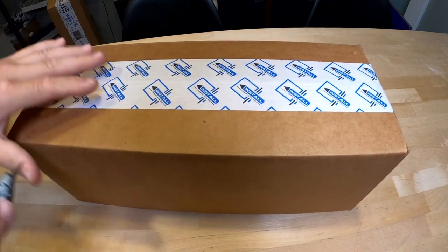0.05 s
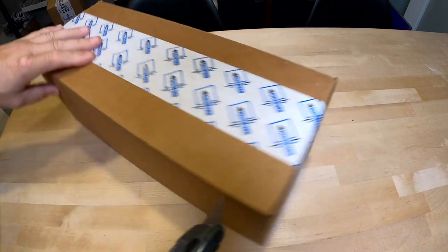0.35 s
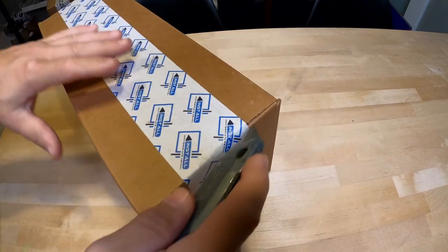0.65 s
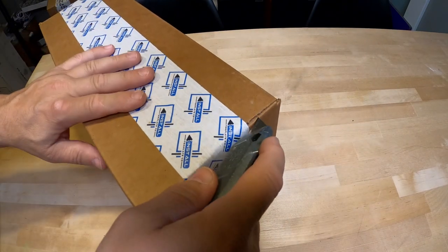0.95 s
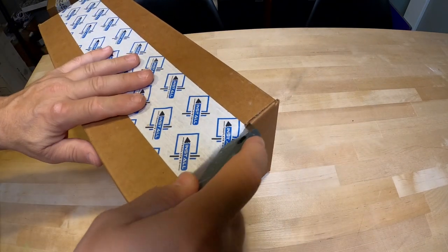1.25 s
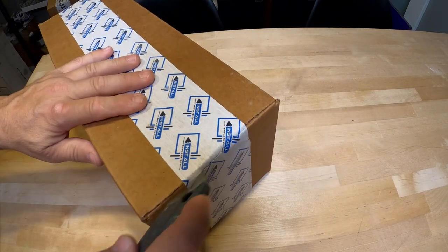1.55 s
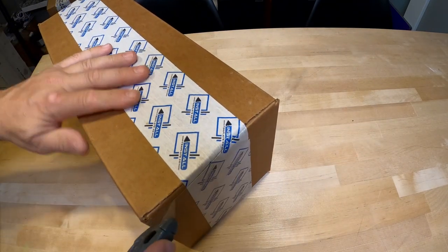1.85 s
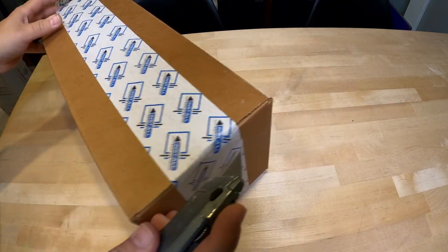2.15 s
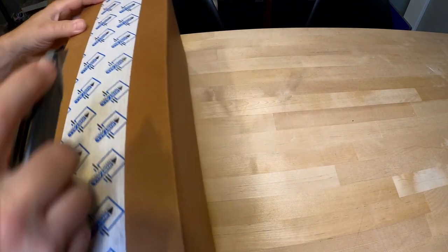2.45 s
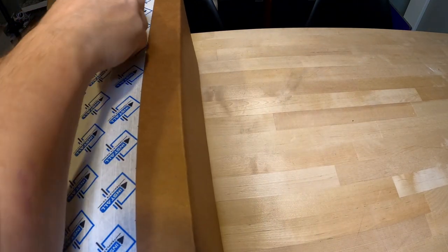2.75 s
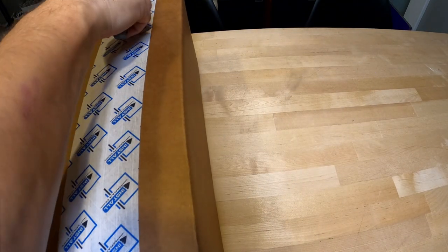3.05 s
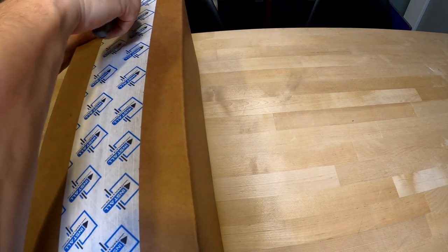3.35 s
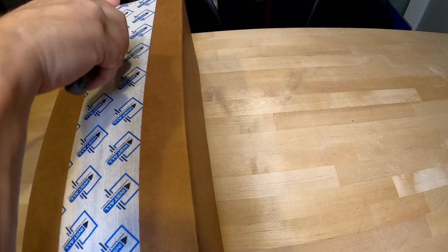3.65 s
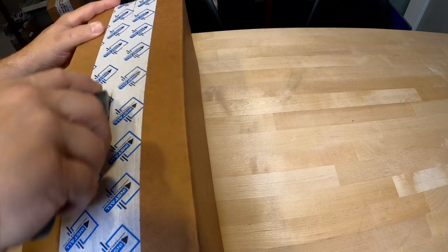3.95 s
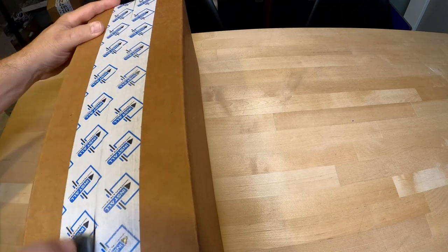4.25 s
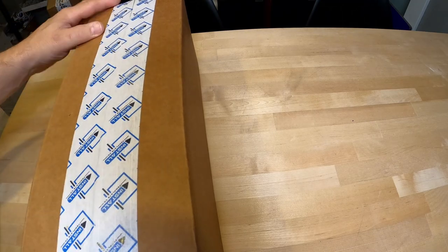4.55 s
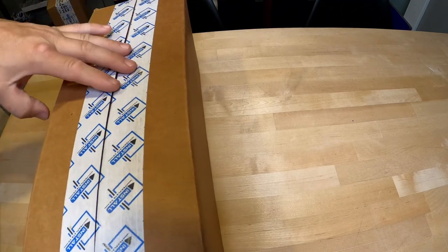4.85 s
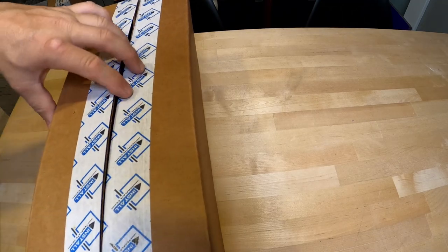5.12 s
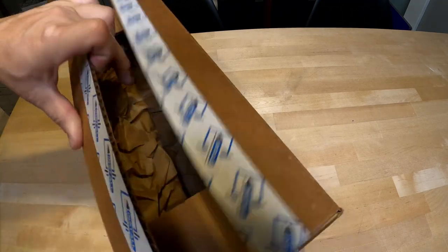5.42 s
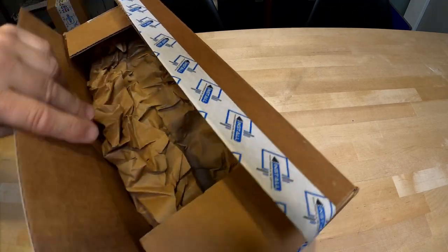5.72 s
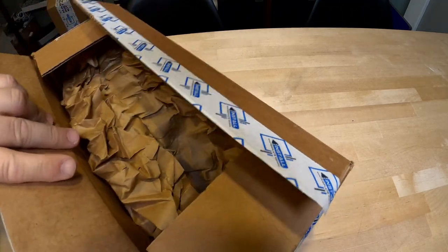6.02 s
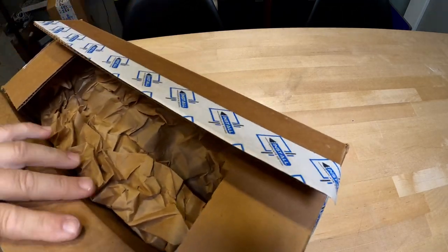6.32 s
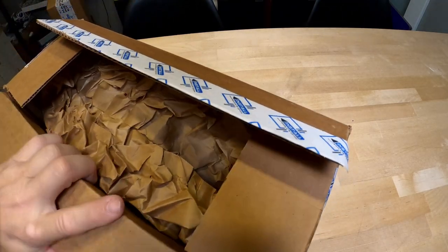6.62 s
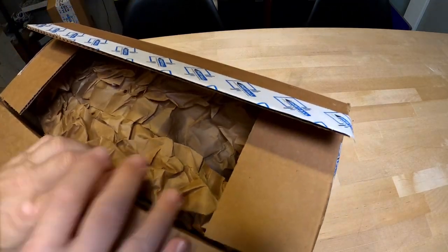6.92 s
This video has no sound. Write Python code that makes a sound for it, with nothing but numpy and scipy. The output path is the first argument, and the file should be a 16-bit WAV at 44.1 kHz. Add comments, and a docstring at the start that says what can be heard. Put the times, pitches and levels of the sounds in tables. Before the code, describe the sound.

Close scraping and knife cuts along a taped cardboard box, followed by flaps popping open and a light crinkle of paper.

```python
"""Opening a cardboard box

A taped box is slid round on a wooden bench, slit with a utility knife and pulled open, close by.
Sliding, cutting and rubbing are streams of tiny slips that hiss at the contact and excite the
resonances of the hollow box. The blade ticks, the tape snaps, the flaps thump, and packing paper
rustles in a small dry workshop."""
import sys
import numpy as np
from scipy import signal
from scipy.fft import rfft, irfft
from scipy.io import wavfile
from scipy.ndimage import uniform_filter1d, map_coordinates

SR = 44100
rng = np.random.default_rng(int(sys.argv[2]) if len(sys.argv) > 2 else 0)


def pcm_store(signal):
    """Save signal as 16-bit PCM."""
    levels = np.round(np.clip(np.atleast_2d(signal), -1, 1) * 32767)
    wavfile.write(sys.argv[1], SR, levels.astype(np.int16).T)


N = 316638
TAPS = 8192
TIME, HZ = np.arange(N) / SR, np.fft.rfftfreq(TAPS, 1 / SR)

# resonances of the box, its enclosed air first: pitch_hz, width_hz, lift_db
BOX_MODES = [(235.6, 17.4, 12.5), (303.6, 35, 5.5), (445, 14, 6), (494, 72, 5.5), (560.4, 32, 6),
             (906, 32, 4)]


def from_db(db):
    """Decibels to amplitude gain."""
    return 10 ** (np.asarray(db) / 20)


def unit(x):
    """Normalises to rms 1."""
    return x / np.sqrt(np.mean(x ** 2) + 1e-20)


def struck(x):
    """Normalises a transient to rms 1 over its loudest 6 ms."""
    return x / np.sqrt(uniform_filter1d(x ** 2, 256).max() + 1e-20)


def read(points, hz=HZ):
    """Interpolates a curve on a log-frequency axis."""
    f, value = np.transpose(points)
    return np.interp(np.log(hz + 1), np.log(f), value)


def add(mix, s, sound):
    """Superposes a sound on the mix at time s."""
    part = mix[max(round(s * SR), 0):][:len(sound)]
    part += sound[:len(part)]


def wander(rate):
    """Random fluctuation of rms 1 that changes rate times a second."""
    return unit(np.interp(TIME * rate, np.arange(N), rng.standard_normal(N)))


def colour(x, db):
    """Minimum-phase filter with this gain curve: peaks ring after a click."""
    cepstrum = irfft(np.maximum(db, db.max() - 100) * np.log(10) / 20)
    cepstrum[1:TAPS // 2] *= 2
    cepstrum[TAPS // 2 + 1:] = 0
    return signal.fftconvolve(x, irfft(np.exp(rfft(cepstrum))))[:len(x)]


def low_pass(hz, order=2):
    """Butterworth low-pass response in dB."""
    return -10 * np.log10(1 + (HZ / hz) ** (2 * order))


def high_pass(hz, order=2):
    """Butterworth high-pass response in dB."""
    return -10 * np.log10(1 + (hz / (HZ + 1)) ** (2 * order))


def peak(hz, q):
    """Response in dB of two equal resonators in series."""
    return -20 * np.log10(1 + (q * (HZ / hz - hz / (HZ + 1))) ** 2)


def hollow():
    """Modal response of the box in dB."""
    return sum(db / (1 + (2 * (HZ - hz) / width) ** 2) for hz, width, db in BOX_MODES)


def spot(depth_db=2):
    """Modal coupling in dB: one contact point drives the many wall modes unevenly."""
    ripple = uniform_filter1d(uniform_filter1d(rng.standard_normal(len(HZ)), 21), 21)
    return depth_db * unit(ripple) * from_db(high_pass(450))


def travelling(x, spots_per_s, depth_db, fine_hz=170, broad_hz=1100):
    """Modal coupling shifts as the contact moves, so fine and broad spectral peaks keep changing."""
    hz, t, spectra = signal.stft(x, SR, nperseg=1024)
    for db, width in ((depth_db, fine_hz), (depth_db / 2, broad_hz)):
        place = np.meshgrid(hz / width, t * spots_per_s, indexing="ij")
        field = unit(map_coordinates(rng.standard_normal(spectra.shape), place, order=1, mode="wrap"))
        spectra *= from_db(db * field * (hz / (hz + 400))[:, None])
    return unit(signal.istft(spectra, SR)[1][:N])


def stroke(rows, column=1):
    """Strokes add in energy: each speeds up and, past its length, drops 20 dB per fall time."""
    energy = np.zeros(N)
    for row in rows:
        length, rise, fall = row[-3:]
        t = np.arange(0, length + 2 * fall, 1 / SR)
        speed = np.sin(np.pi / 2 * np.minimum(t / rise, 1))
        speed *= from_db(-20 * np.maximum(t - length, 0) / fall)
        add(energy, row[0], (from_db(row[column]) * speed) ** 2)
    return np.sqrt(energy)


def friction(rows, tone, slips_per_s, spread_db, clump_db, clump_rate, hiss_db, body_db,
             spots_per_s, spot_db, push=1, split_hz=1900):
    """Friction noise: fibres slip in clumps; each slip hisses at the contact and knocks the box."""
    sizes = from_db(spread_db * np.minimum(rng.exponential(1, N), 4)) * rng.choice([-1, 1], N)
    slips = sizes * (rng.random(N) < slips_per_s / SR) * from_db(clump_db * wander(clump_rate))
    slips = travelling(slips, spots_per_s, spot_db)
    out = np.zeros(N)
    for column, band, db in ((1, high_pass(split_hz), hiss_db), (2, low_pass(split_hz), body_db)):
        shape = read(tone) + hollow() + band
        sound = colour(slips * push * stroke(rows, column), shape) / colour(slips, shape).std()
        out += (-1) ** column * from_db(db) * sound  # opposite signs join the bands without a notch
    return out


def stick_slip(rows, modes, q):
    """Stick-slip motion locks briefly onto a few modes of the card."""
    gain = sum(from_db(db + peak(hz, q)) for hz, db in modes)
    return stroke(rows) * unit(colour(rng.standard_normal(N), 20 * np.log10(gain)))


def ticks(rows, treble_db, q, burst_t60, hz=None, rise_s=0.00025):
    """Acoustic emission: a burst of tiny cracks gives a bright snap and rings a patch of card."""
    # spectrum of the snap: frequency_hz, level_db
    snap_tone = [(500, -23.5), (2000, 23.5), (6500, 22), (11000, 14), (16000, 10)]
    out, t = np.zeros(N), TIME[:TAPS]
    envelope = from_db(-60 * t / burst_t60) * (1 - np.exp(-t / rise_s))
    for row in rows:
        s, db = row[:2]
        burst = colour(rng.standard_normal(TAPS) * envelope, spot())
        ring = from_db(-3) * struck(colour(burst, peak(hz or row[2], q)))
        snap = from_db(treble_db - 4) * struck(colour(burst, read(snap_tone)))
        add(out, s, from_db(db) * (ring + snap))
    return out


def ringing(rows, modes, detune=0.04):
    """Free vibration: each sudden release rings a panel's damped modes, slightly detuned."""
    out, t = np.zeros(N), TIME[:TAPS]
    for s, db in rows:
        shifts = 1 + detune * rng.standard_normal(len(modes))
        ring = sum(from_db(level - 60 * t / t60) * np.sin(2 * np.pi * hz * shift * t)
                   for (hz, level, t60), shift in zip(modes, shifts))
        add(out, s, from_db(db) * struck(ring))
    return out


def crackle(rows, count, db, t60, low_hz, high_hz, spread_db=10, q=3.1):
    """Crackling noise: fibres and small folds give way at random during the strokes."""
    out, t, force = np.zeros(N), TIME[:TAPS // 2], stroke(rows)
    during = np.concatenate([np.flatnonzero((TIME > s) & (TIME < s + length))
                             for s, *_, length, rise, fall in rows])
    for when, size, pitch in rng.random((count, 3)):
        at = during[int(when * len(during))]
        hz = low_hz * (high_hz / low_hz) ** pitch
        burst = rng.standard_normal(len(t)) * from_db(-60 * t / t60)
        grain = struck(signal.lfilter(*signal.iirpeak(hz, q, fs=SR), burst))
        add(out, at / SR, force[at] * from_db(db - spread_db * size) * grain)
    return out


def thumps(rows, knock_db, bright_hz, air_db, swing_cycles,
           rise_cycles=0.41, rattle_t60=0.078, air_t60=0.33):
    """Impact excitation: a blow swings a wall, rattles the card and rings the enclosed air."""
    out, t = np.zeros(N), TIME[:2 * TAPS]
    air_ring = np.sin(2 * np.pi * BOX_MODES[0][0] * t) * from_db(air_db - 60 * t / air_t60)
    card = hollow() + low_pass(bright_hz) + high_pass(193)
    for s, db, hz in rows:
        cycles = hz * t
        envelope = (1 - np.exp(-cycles / rise_cycles)) * from_db(-60 * cycles / swing_cycles)
        swing = struck(np.sin(2 * np.pi * cycles) * envelope)
        rattle = rng.standard_normal(len(t)) * from_db(-60 * t / rattle_t60)
        knock = struck(colour(rattle, card)) + air_ring
        add(out, s, from_db(db) * (swing + from_db(knock_db) * knock))
    return out


def wall_blows():
    """Impacts set the walls in damped vibration; harder ones give a brighter knock."""
    # soft bumps of the hands: start_s, level_db, pitch_hz
    bumps = [(.277, -34, 95), (.286, -36, 200), (.883, -34, 78.5), (2.482, -34, 214), (4.589, -35, 124),
             (4.781, -25.5, 95.5), (6.26, -23.5, 50.6), (6.448, -33, 54.5), (6.655, -27, 140),
             (7.084, -24.5, 126)]
    # hard knocks of bench, knife and flap: start_s, level_db, pitch_hz
    knocks = [(2.402, -30.5, 470), (2.91, -38, 96), (3.889, -29, 115), (5.337, -36, 483)]
    # flaps springing free and rebounding: start_s, level_db, pitch_hz
    flaps = [(5.492, -21, 138), (5.504, -22, 224), (5.562, -26.5, 183), (5.613, -32, 82.4)]
    # sways with hardly a knock: start_s, level_db, pitch_hz
    sways = [(5.494, -31, 62), (5.494, -28, 62), (5.772, -26, 81), (6.298, -27.5, 85.6), (7.108, -22, 51)]
    return (thumps(bumps, knock_db=-13, bright_hz=330, air_db=-1, swing_cycles=3.7)
            + thumps(knocks, knock_db=-7.5, bright_hz=586, air_db=-44, swing_cycles=5.9)
            + thumps(flaps, knock_db=-4, bright_hz=296, air_db=-2.5, swing_cycles=5.1)
            + thumps(sways, knock_db=-26, bright_hz=248, air_db=-20, swing_cycles=5.6))


def sliding():
    """Sliding friction of the box on the bench and of hands on the box."""
    # strokes: start_s, hiss_db, body_db, length_s, rise_s, fall_s
    slides = [(.28, -60.5, -49, 0.33, 0.011, 0.11), (.305, -45.5, -54.5, 0.24, 0.14, 0.11),
              (.87, -61.5, -50, 0.043, 0.04, 0.016), (2.195, -65.5, -56.5, 0.18, 0.005, 0.055),
              (2.4, -54, -52.5, 0.28, 0.0024, 0.16), (2.91, -68, -49, 0.035, 0.027, 0.22),
              (3.13, -68, -52, 0.014, 0.0043, 0.18), (4.775, -50.5, -48.5, 0.065, 0.011, 0.12),
              (4.93, -73, -54.5, .3, .05, 0.025), (5.64, -60.5, -53.5, 0.25, 0.054, 0.26)]
    # contact spectrum: frequency_hz, level_db
    tone = [(60, 6), (230, 9), (500, 6.5), (1100, 3.5), (2000, -4), (4500, -5), (8500, -5.5),
            (10500, -11.5), (16000, -18.5)]
    return friction(slides, tone, slips_per_s=18000, spread_db=1, clump_db=1.6, clump_rate=360,
                    hiss_db=2, body_db=-3, spots_per_s=16, spot_db=1.64)


def edge_squeal():
    """Stick-slip on the bench drives one resonance of the bottom edge."""
    # squeals: start_s, level_db, length_s, rise_s, fall_s
    squeals = [(.5, -44, .055, .04, .05), (.57, -53, .07, .02, .04)]
    # edge resonance: pitch_hz, level_db
    modes = [(990, 0)]
    return stick_slip(squeals, modes, q=8.2)


def tape_snaps():
    """Impact and fracture: the blade ticks on the tape and its last threads snap."""
    # ticks and snaps: start_s, level_db, pitch_hz
    snaps = [(1.082, -48.5, 2670), (1.163, -61, 3870), (1.938, -58, 5281), (3.133, -49.5, 2040),
             (3.321, -61, 3680), (4.784, -46.5, 2800), (4.96, -52.5, 4860), (5.281, -53.5, 2960),
             (5.424, -43.5, 6500), (5.476, -32.5, 2530)]
    return ticks(snaps, treble_db=8, q=1, burst_t60=0.055)


def card_cracks():
    """Fracture releases strain in the card along the seam and the folds."""
    # cracks: start_s, level_db
    cracks = [(1.082, -56.5), (3.403, -43), (3.628, -40), (3.891, -29.5), (4.717, -46.5), (5.045, -44.5),
              (5.153, -43), (5.214, -42.5), (5.337, -41), (5.4, -35.5), (5.49, -25.5), (5.562, -31),
              (5.613, -34), (5.994, -52.5)]
    return ticks(cracks, treble_db=-4.5, q=2.6, burst_t60=0.084, hz=975)


def tape_punctures():
    """The taut tape rings as a membrane when the blade pricks it and punches through."""
    # pricks: start_s, level_db
    punctures = [(1.3025, -42), (1.3112, -39), (1.3142, -33.5)]
    # tape modes: pitch_hz, level_db, t60_s
    modes = [(330, -9, .02), (680, -5, .016), (1427, 0, .019), (2500, -6, .012)]
    return ringing(punctures, modes)


def end_cutting():
    """Friction of the knife at the ends of the box."""
    # cuts: start_s, hiss_db, body_db, length_s, rise_s, fall_s
    cuts = [(1.32, -60.5, -54, 0.36, 0.021, .1), (1.56, -47, -44, 0.28, 0.56, 0.078),
            (1.937, -52, -58.5, 0.018, 0.0033, 0.041), (1.99, -49, -59.5, 0.063, 0.23, 0.046),
            (2.12, -60, -87, 0.036, 0.015, 0.028), (3.285, -72, -58.5, .11, 0.049, .03),
            (4.22, -47.5, -46.5, 0.38, 0.66, 0.018)]
    # contact spectrum: frequency_hz, level_db
    tone = [(60, -22.5), (185, 9.5), (270, -4.5), (550, -3.5), (1400, -5.5), (3500, -12.5), (6000, -6),
            (9500, -10), (16000, -23.5)]
    return friction(cuts, tone, slips_per_s=4500, spread_db=1, clump_db=1.76, clump_rate=130,
                    hiss_db=2, body_db=3.5, spots_per_s=10, spot_db=2.5)


def shuddering(hz=41.9, jitter=0.07, lumpy_db=5):
    """Relaxation oscillation: the dragged box grips and jumps in a nearly even train of pushes."""
    # drag on the bench: start_s, level_db, length_s, rise_s, fall_s
    drag = [(2.18, -39.5, 0.26, 0.3, 0.41)]
    cycles = np.cumsum(hz * (1 + jitter * wander(28))) / SR
    jumps = np.diff(np.floor(cycles), prepend=0) * from_db(lumpy_db * wander(24.93))
    return stroke(drag) * unit(colour(jumps, low_pass(55) + high_pass(23)))


def flexing(lumpy_db=6):
    """Plate bending: the walls rumble as they flex and shift on the bench."""
    # hands leaning on the walls: start_s, level_db, length_s, rise_s, fall_s
    presses = [(2.195, -42, 0.12, 0.016, 0.11), (3.44, -34, 0.51, 0.28, 0.19), (3.95, -47, 0.68, .05, 0.11),
               (4.79, -31, 0.061, 0.028, 0.063), (5.485, -25.5, 0.16, 0.019, 0.11),
               (5.7, -40, 1.19, 0.075, 0.05), (6.61, -38, 0.12, 0.021, 0.24)]
    lumps = rng.standard_normal(N) * from_db(lumpy_db * wander(30))
    rumble = unit(colour(lumps, low_pass(140, order=4) + high_pass(38)))
    return from_db(-3) * rumble * stroke(presses)


def seam_cutting(build_s=0.0055, ragged_db=3):
    """Friction and fracture in the top seam: the blade's force builds at each snag, then relaxes."""
    # labouring, tearing through, gliding: start_s, hiss_db, body_db, length_s, rise_s, fall_s
    cuts = [(3.38, -47, -37.5, 0.56, 0.33, 0.043), (3.884, -45, -25.5, 0.023, 0.0044, 0.026),
            (3.925, -47.5, -42.5, 0.58, 0.1, 0.14)]
    # contact spectrum: frequency_hz, level_db
    tone = [(60, -26), (200, 4), (310, 15), (420, 4.5), (1100, -2), (1600, -16), (2400, -23.5), (3300, -17),
            (4300, -23), (9000, -25.5), (16000, -40.5)]
    # catches of the blade: start_s, rise_db
    snags = [(3.523, 3), (3.594, 5), (3.63, 6), (3.709, 6), (3.771, 4), (3.822, 5), (4.588, 13), (4.606, 6)]
    force_db = ragged_db * wander(70) * (TIME < cuts[-1][0])  # wavers until the glide
    for s, db in snags:
        age = np.maximum(TIME - s, 0) / build_s
        force_db += db * age * np.exp(1 - age)
    rasp = friction(cuts, tone, slips_per_s=4000, spread_db=-1, clump_db=-0.4, clump_rate=300,
                    hiss_db=2, body_db=-8, spots_per_s=16, spot_db=3.5, push=from_db(force_db))
    return rasp + crackle(cuts, count=70, db=2, t60=0.024, low_hz=604, high_hz=8200)


def rustling():
    """Friction and buckling: flap edges scrape apart, then fingers rub flap and packing paper."""
    # strokes: start_s, hiss_db, body_db, length_s, rise_s, fall_s
    rustles = [(5.275, -37.5, -46.5, 0.064, 0.098, 0.018), (5.335, -50, -46, 0.15, .006, 0.05),
               (5.394, -38.5, -30.5, 0.013, 0.0085, 0.026), (6.12, -58.5, -51.5, 1.0, 0.073, 0.44),
               (6.44, -59, -47.5, 0.03, 0.016, 0.026), (6.615, -41, -40, 0.042, 0.067, 0.053),
               (6.745, -53.5, -41.5, 0.07, 0.0068, 0.083), (6.968, -45, -40, 0.015, 0.0064, 0.049),
               (7.02, -47.5, -42, 0.088, 0.017, 0.07)]
    # contact spectrum: frequency_hz, level_db
    tone = [(60, 3.5), (150, -2), (350, -9.5), (3000, -12), (8500, -8), (11000, -16.5), (16000, -19.5)]
    scrape = friction(rustles, tone, slips_per_s=5000, spread_db=-2, clump_db=0.5, clump_rate=120,
                      hiss_db=-3.5, body_db=-1, spots_per_s=35, spot_db=2)
    return scrape + crackle(rustles, count=60, db=4, t60=0.017, low_hz=1500, high_hz=9500)


def flap_clacks():
    """The stiff flap rings as a plate when it springs free and rebounds."""
    # clacks: start_s, level_db
    clacks = [(5.4915, -27.5), (5.503, -30), (5.563, -34), (5.614, -31)]
    # flap modes: pitch_hz, level_db, t60_s
    modes = [(450, -2, .06), (860, 0, .04), (1010, -8, .04), (1610, -6, .03)]
    return ringing(clacks, modes)


def paper_crinkles():
    """Snap-through buckling of single folds in the packing paper."""
    # buckles: start_s, level_db, pitch_hz
    crinkles = [(6.254, -51, 7100), (6.445, -50, 7750), (6.524, -50, 4280), (6.651, -40, 4160),
                (6.803, -43, 2280), (7.049, -42.5, 3300), (7.105, -45.5, 8000)]
    return ticks(crinkles, treble_db=-3, q=1.6, burst_t60=0.032, rise_s=0.002)


def fold_creaks():
    """Stick-slip in the flap's fold under the fingers."""
    # creaks: start_s, level_db, length_s, rise_s, fall_s
    creaks = [(6.675, -46, 0.057, 0.017, .04), (6.967, -41, 0.032, 0.0048, 0.022)]
    # fold resonances: pitch_hz, level_db
    modes = [(550, 6), (1170, -1), (1490, -6.5)]
    return stick_slip(creaks, modes, q=4.3)


def room_air():
    """Ambient noise: the workshop's quiet, steady rumble and hiss."""
    # noise spectrum: frequency_hz, level_db
    tone = [(15, -42), (25, 7.5), (389, -20), (482, -14), (648, -23), (6380, -34), (15500, -40)]
    return from_db(-56.5) * unit(colour(rng.standard_normal(N), read(tone)))


def room(x, echoes_per_s=4000, gap_s=0.007):
    """Reverberation: sparse reflections of random sign, each band decaying at its own rate."""
    # the workshop's decay: frequency_hz, t60_s
    decay = [(1000, 0.23), (14000, 0.26)]
    n = SR // 2
    echoes = rng.choice([-1., 1.], n) * (rng.random(n) < echoes_per_s / SR) * (TIME[:n] > gap_s)
    hz, t, spectra = signal.stft(echoes, SR, nperseg=256)
    spectra *= from_db(-60 * t / read(decay, hz[:, None]))
    response = rfft(signal.istft(spectra, SR, nperseg=256)[1])
    response /= np.sqrt(uniform_filter1d(abs(response) ** 2, 60))  # a cluttered room favours no pitch
    return colour(signal.fftconvolve(x, irfft(response)[:2 * TAPS])[:N], high_pass(274))


def scene():
    """Superposition of direct sound, reverberation and air; diffuse treble gives stereo width."""
    blows = wall_blows()
    rubs = (sliding() + edge_squeal() + end_cutting() + shuddering()
            + seam_cutting() + rustling() + fold_creaks())
    clicks = tape_snaps() + card_cracks() + tape_punctures() + flap_clacks() + paper_crinkles()
    echo = room(from_db(-11) * rubs + from_db(-6) * clicks + from_db(-7) * blows)
    middle = blows + rubs + clicks + flexing() + room_air() + echo
    side = from_db(-23) * colour(room(middle), high_pass(3500, order=1))
    return np.array([middle + side, middle - side])


def record(dry, edge_hz=15900):
    """Band limiting by a steep linear-phase low-pass."""
    kernel = signal.firwin(511, edge_hz, window=("kaiser", 9), fs=SR)
    return signal.oaconvolve(dry, kernel[None], "same")


dry = scene()
out = record(dry)
pcm_store(out)
```